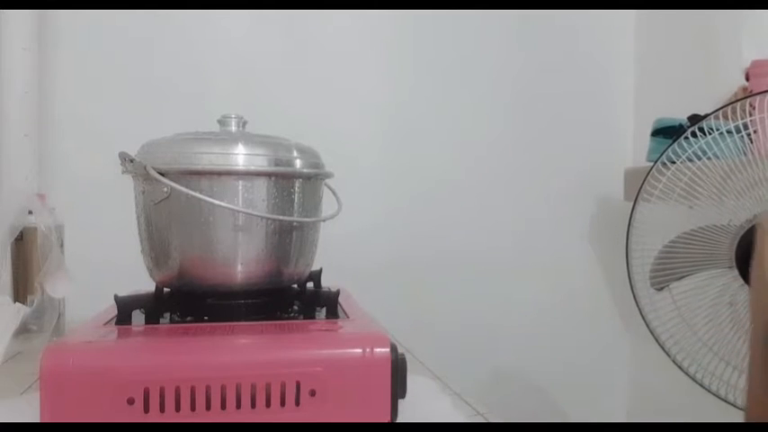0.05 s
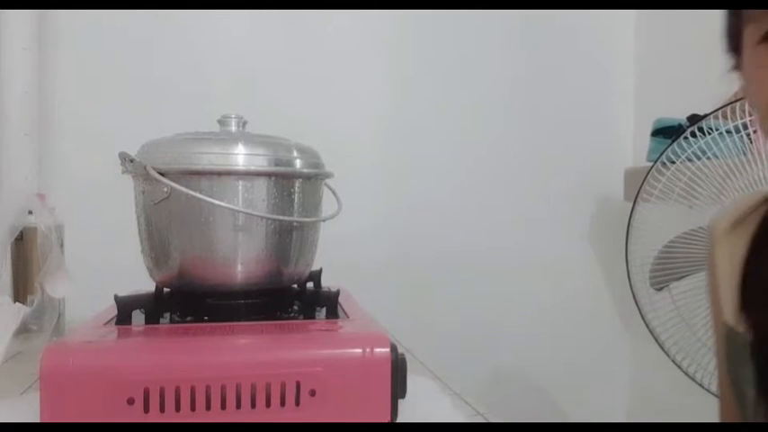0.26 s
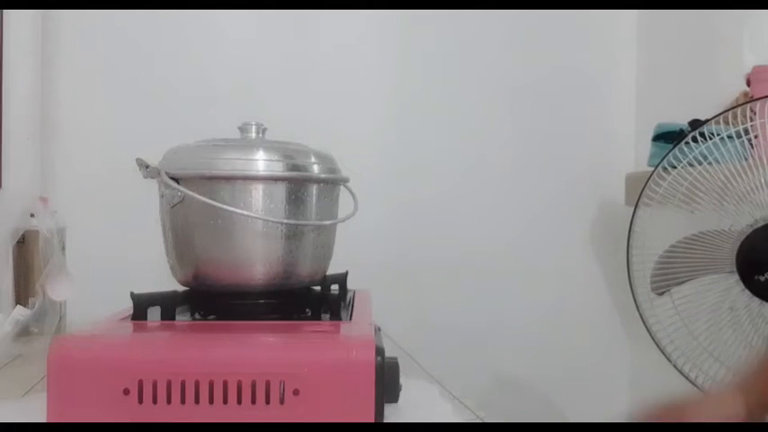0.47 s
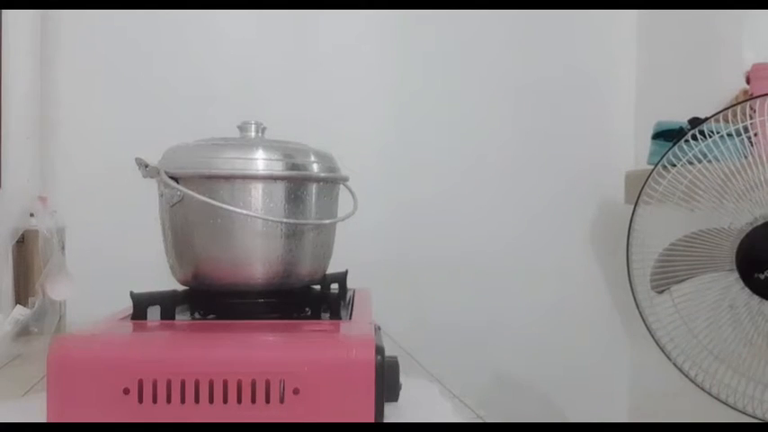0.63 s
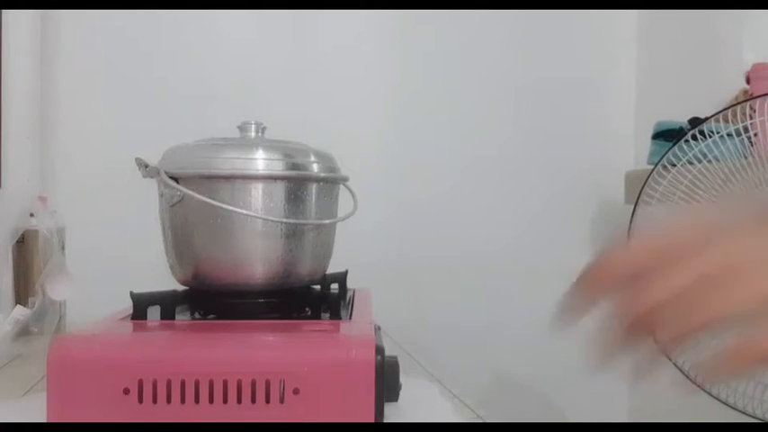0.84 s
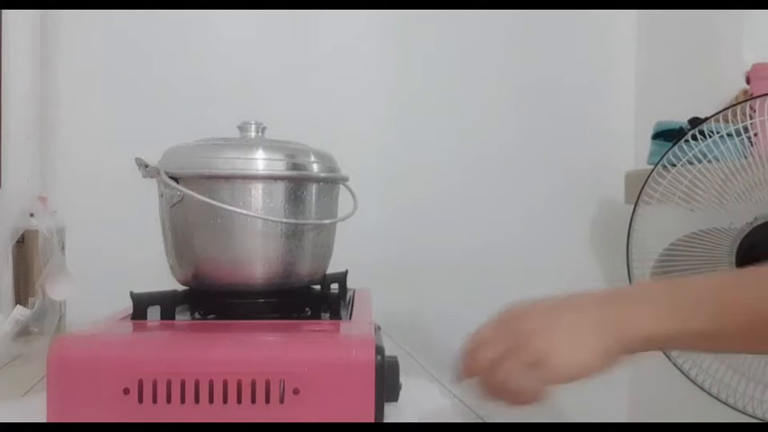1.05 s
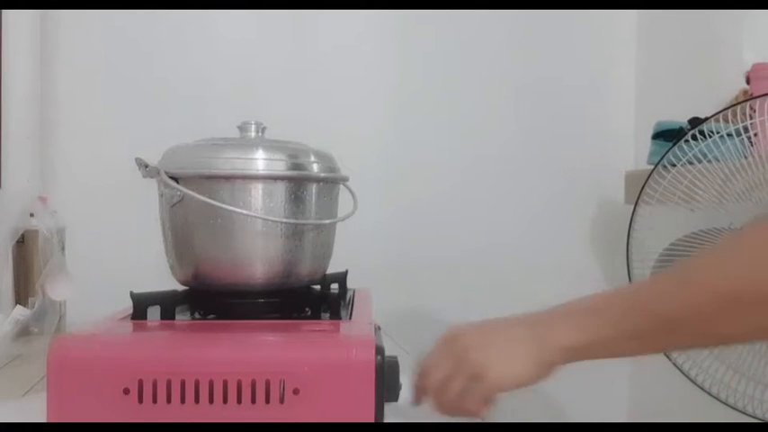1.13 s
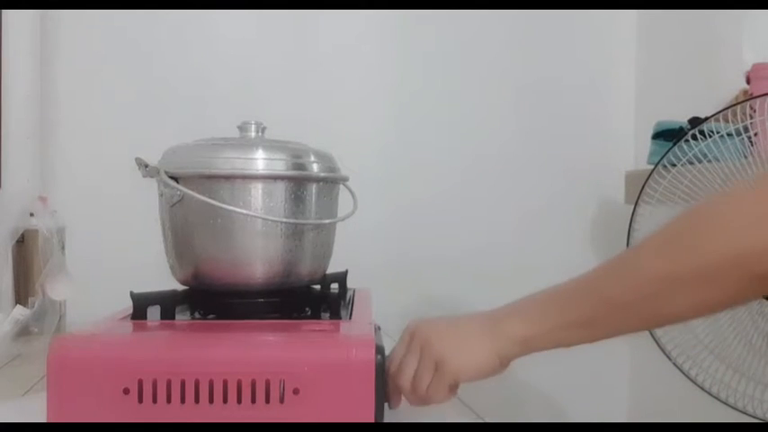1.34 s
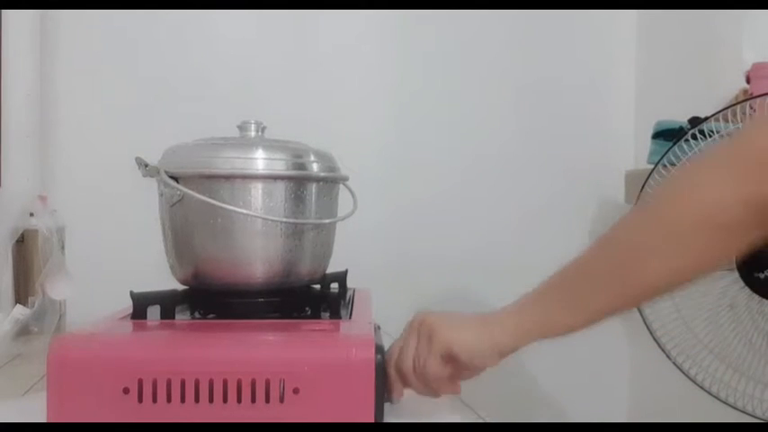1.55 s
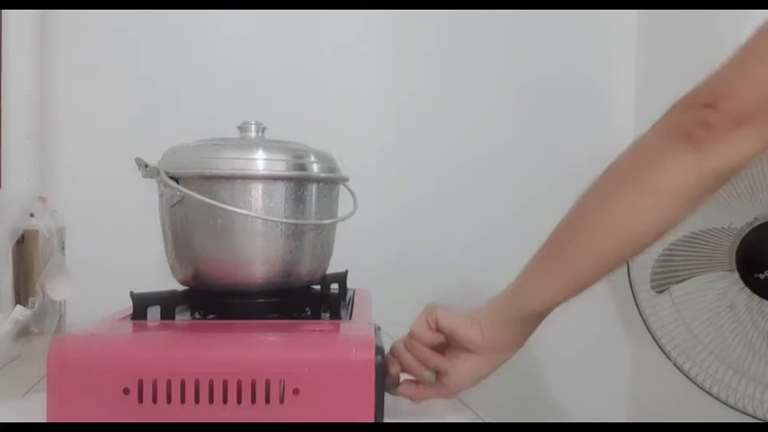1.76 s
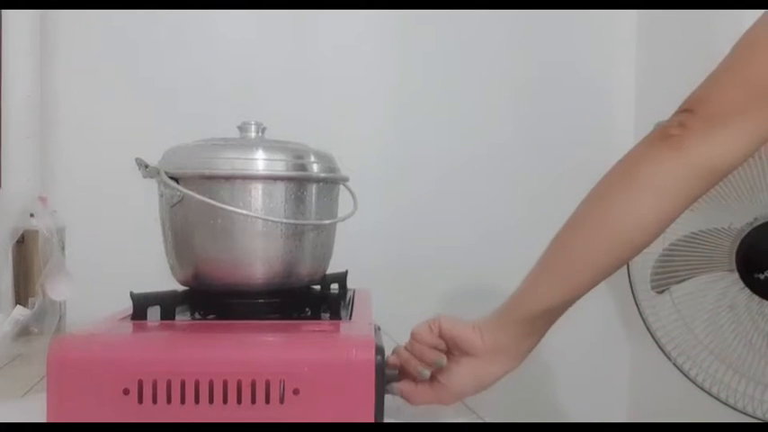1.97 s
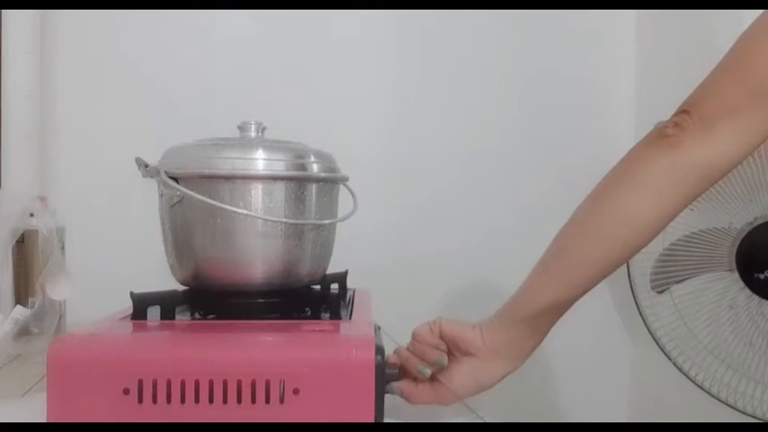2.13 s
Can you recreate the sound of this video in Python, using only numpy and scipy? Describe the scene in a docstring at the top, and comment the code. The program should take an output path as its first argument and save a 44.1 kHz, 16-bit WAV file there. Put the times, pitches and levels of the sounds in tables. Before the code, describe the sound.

Close phone microphone, small reverberant room: fading hiss, gritty scrape ending in knocks and a thud, dry handling thumps with a tiny dropout, then the stove knob's sharp metallic igniter clack and a faint singing gas jet.

```python
"""A portable gas stove in a bare, tiled room. A hiss dies away over steady air (coloured noise); a scrape (gritty noise)
ends in knocks (noise bursts plus damped modes) and a thud. The phone is bumped as it is set in place (swelling
sines, dry ticks, grip rustle) and the sound cuts out for an instant. A hand takes the knob, a squeak leads to the
igniter hammer's snap, which rings stove and pot; the gas jet hisses and whistles (noise, narrow resonance) and the
burner sings (gliding sine, narrow noise)."""
import sys
import numpy as np
from scipy import signal
from scipy.fft import rfft, irfft
from scipy.io import wavfile
from scipy.ndimage import uniform_filter1d

SR = 44100
rng = np.random.default_rng(int(sys.argv[2]) if len(sys.argv) > 2 else 0)


def dump(signal):
    """Clip the signal to [-1, 1] and save it as 16-bit WAV at the path in sys.argv[1]."""
    limited = np.clip(np.atleast_2d(signal).T, -1, 1)
    pcm = np.round(limited * 32767).astype(np.int16)
    wavfile.write(sys.argv[1], SR, pcm)


N = 97020

# Modes of stove and pot. Each row: frequency in Hz, relative level in dB, T60 in s.
STOVE_MODES = [(425.4, 6.5, 0.51), (810, 7, 0.24), (990, 10.5, 0.47), (1492, 8, 0.55), (1705, 14.5, 0.19),
               (2094, 6, 0.32), (3115, 8.5, 0.5), (3590, -3, .3), (3720, 5, .6), (8150, 19.5, 0.13)]
# Spectrum of the phone's ticks and of the squeak's noise. Each row: frequency in Hz, relative level in dB.
TICK_COLOUR = [(800, -0.5), (1300, -6), (4400, -7.5), (5200, -19), (15500, -30.5)]


def undb(db):
    """Decibels to gain."""
    return 10 ** (np.asarray(db) / 20)


def unit(x):
    """Scale to rms 1."""
    return x / np.sqrt(np.mean(x ** 2))


def one_second(x):
    """Scale to the energy of one second at rms 1."""
    return x * np.sqrt(SR / np.sum(x ** 2))


def times():
    """Time of every sample in s."""
    return np.arange(N) / SR


def fade(time_s, level_db):
    """Gain along a level curve, practically silent (-150 dB) outside it."""
    return undb(np.interp(times(), time_s, level_db, left=-150, right=-150))


def over_hz(points, hz):
    """Read (Hz, value) points on a log-frequency axis."""
    point_hz, value = np.array(points).T
    return np.interp(np.log(np.maximum(hz, 1)), np.log(point_hz), value)


def colour(x, points):
    """Minimum-phase filter of the given (Hz, dB) shape and unit energy, made by folding the cepstrum."""
    size = 4096
    gain = undb(over_hz(points, np.linspace(0, SR / 2, size // 2 + 1)))
    cepstrum = irfft(np.log(gain))
    cepstrum[1:size // 2] *= 2
    cepstrum[size // 2 + 1:] = 0
    impulse = irfft(np.exp(rfft(cepstrum)))
    return signal.fftconvolve(x, impulse / np.linalg.norm(impulse))[:N]


def noise(points):
    """Steady coloured noise, rms 1."""
    return unit(colour(rng.standard_normal(N), points))


def decay(start_s, t60_s):
    """Exponential amplitude decay from a start time."""
    age_s = times() - start_s
    return (age_s >= 0) * np.exp(-np.log(1000) * np.maximum(age_s, 0) / t60_s)


def ring(start_s, modes):
    """Damped sine modes set going at one moment, followed for at most half a second."""
    first = int(start_s * SR)
    age_s = np.arange(min(N - first, SR // 2)) / SR
    out = np.zeros(N)
    for hz, db, t60_s in modes:
        envelope = undb(db) * np.exp(-np.log(1000) * age_s / t60_s)
        out[first:first + len(age_s)] += envelope * np.sin(2 * np.pi * hz * age_s)
    return out


def contacts(hits, t60_s):
    """Power of a short burst of dense vibration for each (s, dB) contact."""
    return sum((undb(db) * decay(start_s, t60_s)) ** 2 for start_s, db in hits)


def cracks(power, points):
    """Dry, dense vibration: coloured noise that follows a power envelope."""
    return colour(np.sqrt(power) * rng.standard_normal(N), points)


def room(power, points, direct_db):
    """Direct sound plus the diffuse field that it feeds; the treble dies first."""
    # Reverberation. Each row: band centre in Hz, T60 in s.
    room_t60 = [(300, 0.62), (1400, 0.53), (4000, 0.45), (14000, .38)]
    build_s = 0.0053
    hz = np.linspace(0, SR / 2, N // 2 + 1)
    spectrum = rfft(rng.standard_normal(N))
    centres_hz = [row[0] for row in room_t60]
    build = 1 - np.exp(-times() / build_s)
    tail = 0
    for share, (_, t60_s) in zip(np.eye(len(centres_hz)), room_t60):
        response = (build * decay(0, t60_s)) ** 2
        field_power = np.abs(signal.fftconvolve(power, response / response.sum())[:N])
        band = irfft(spectrum * over_hz(list(zip(centres_hz, share)), hz), N)
        tail = tail + band * np.sqrt(field_power)
    return undb(direct_db) * cracks(power, points) + colour(tail, points)


def strike(hits, t60_s, points, modes, ring_db, direct_db):
    """Contacts heard through the room, and the strong and weak modes that the hardest one sets going."""
    shimmer_db, shimmer_t60_s, shimmer_hz = -10, 0.52, (899.7, 11463)  # many weak upper modes
    hardest_s = max(hits, key=lambda hit: hit[1])[0]
    weak = []
    for place, mode_power in rng.uniform(size=(70, 2)):
        weak.append((np.interp(place, [0, 1], shimmer_hz), 10 * np.log10(mode_power), shimmer_t60_s))
    shimmer = undb(shimmer_db) * one_second(colour(ring(hardest_s, weak), points))
    burst = one_second(room(contacts(hits, t60_s), points, direct_db))
    return burst + undb(ring_db) * one_second(ring(hardest_s, modes)) + shimmer


def whistle(hz, width_hz):
    """Turbulence in one narrow resonance that may glide: low-passed noise shifted up to hz, rms 1."""
    sos = signal.butter(2, width_hz / 2, fs=SR, output="sos")
    a, b = signal.sosfilt(sos, rng.standard_normal((2, N)))
    carrier = np.exp(2j * np.pi * np.cumsum(hz * np.ones(N)) / SR)
    return unit(np.real((a + 1j * b) * carrier))


def body(x):
    """The sheet metal colours the whole snap: a resonant lift at each mode of the stove."""
    width_hz, boost_db = 39, 2.5
    peaks = sum(signal.lfilter(*signal.iirpeak(hz, hz / width_hz, fs=SR), x) for hz, _, _ in STOVE_MODES)
    return x + (undb(boost_db) - 1) * peaks


def igniter():
    """Fingers find the knob, the cam squeaks as it loads the spring, and the hammer snaps."""
    # Fingers on the knob. Each row: start in s, relative level in dB.
    touches = [(1.2345, 0)]
    # Touch spectrum. Each row: frequency in Hz, relative level in dB.
    touch_colour = [(300, -11), (3200, -16), (5600, 7), (6800, -1), (9000, 5), (12000, -13)]
    # Hammer release, blow, rebounds. Each row: start in s, relative level in dB.
    snaps = [(1.8318, 1), (1.8358, 4.5), (1.8385, -1), (1.857, -27)]
    # Snap spectrum. Each row: frequency in Hz, relative level in dB.
    snap_colour = [(120, -25), (400, -10), (1150, -13), (1650, -7.5), (2500, -13.5), (3300, -5),
                   (6700, -12.5), (8100, -6.5), (10500, -19), (15500, -25.5)]
    touch_db, touch_t60_s, touch_direct_db = -75.5, 0.0083, -2
    squeak_s, squeak_rise_s, squeak_hz, squeak_db = 1.832, 0.022, 794, -45.5
    snap_db, snap_t60_s, snap_direct_db, snap_ring_db = -45.5, 0.022, -7.5, -10.5

    touch = one_second(room(contacts(touches, touch_t60_s), touch_colour, touch_direct_db))
    load = np.clip(1 - np.abs(times() - squeak_s) / squeak_rise_s, 0, 1)  # rises and falls linearly
    tone = unit(np.sin(2 * np.pi * squeak_hz * times()))
    squeak = load * (tone + 0.5 * noise(TICK_COLOUR))
    snap = body(strike(snaps, snap_t60_s, snap_colour, STOVE_MODES, snap_ring_db, snap_direct_db))
    return undb(touch_db) * touch + undb(squeak_db) * squeak + undb(snap_db) * snap


def gas():
    """The jet hisses and whistles higher as the valve opens; the burner tube sings soon after."""
    # Gas jet. Each row: time in s, whistle frequency in Hz, whistle level in dB, hiss level in dB.
    jet_curve = [(1.961, 4940, -71, -57), (2.026, 5040, -52, -68), (2.091, 5180, -60, -58.5),
                 (2.2, 5450, -67, -58)]
    # Jet hiss spectrum. Each row: frequency in Hz, relative level in dB.
    jet_colour = [(500, 6), (1200, 6.5), (2500, -8), (4200, 4), (6900, -1.5), (8400, 1), (9800, -12),
                  (15500, -13)]
    jet_width_hz = 150
    burner_s, burner_attack_s, burner_hz, burner_db = 2.045, 0.086, 930, -59
    sharp_hz, settle_s = 150, 0.018  # the note starts sharp and settles
    rush_hz, rush_width_hz, rush_db = 1040, 70, -64  # rush of gas around the note

    time_s, hz, whistle_db, hiss_db = np.array(jet_curve).T
    jet = whistle(np.interp(times(), time_s, hz), jet_width_hz) * fade(time_s, whistle_db)
    jet = jet + noise(jet_colour) * fade(time_s, hiss_db)
    opening = np.clip((times() - burner_s) / burner_attack_s, 0, 1)
    pitch_hz = burner_hz + sharp_hz * np.exp(-np.maximum(times() - burner_s, 0) / settle_s)
    tone = opening ** 2 * unit(np.sin(2 * np.pi * np.cumsum(pitch_hz) / SR))
    rush = np.sqrt(opening) * whistle(rush_hz, rush_width_hz)
    return jet + undb(burner_db) * tone + undb(rush_db) * rush


def clatter():
    """A low rub grows into a gritty scrape, which ends in hard knocks and a hollow thud."""
    # Rub and scrape envelopes. Each row: time in s, level in dB.
    rub_curve = [(0.155, -65), (0.185, -46), (0.225, -40.5), (0.255, -63)]
    scrape_curve = [(0.199, -32), (0.215, -34.5), (0.239, -28), (0.265, -47), (0.31, -62), (0.34, -63)]
    # Hard knocks. Each row: start in s, relative level in dB.
    knock_hits = [(0.252, 6), (0.2552, 5.5), (0.2675, 0.5), (0.2822, 3), (0.296, -3)]
    # Spectra. Each row: frequency in Hz, relative level in dB.
    rub_colour = [(100, -9), (300, 2.5), (750, -4.5), (1300, -22.5)]
    scrape_colour = [(90, -17.5), (280, 1), (900, -6), (1650, -0.5), (3300, -8), (10000, -5.5),
                     (15500, -21)]
    knock_colour = [(80, -22.5), (200, -1.5), (500, -0.5), (900, -10.5), (1600, -7), (3700, 2), (6500, -5),
                    (7600, 0), (11500, -7.5), (15500, -10.5)]
    # Modes of the knocked object and of the thud. Each row: frequency in Hz, relative level in dB, T60 in s.
    knock_modes = [(2360, -2, 0.36), (2560, 5, 0.5), (3260, -8, 0.98), (3490, 5, 0.48), (3600, -6, 0.46),
                   (3820, -6, 1), (3793, 8, 0.38), (5462, 5, .4)]
    thud_modes = [(178.7, 4.5, 0.18), (259.5, -3, 0.2), (308, 7, 0.17)]
    knock_db, knock_t60_s, knock_direct_db, knock_ring_db = -39.5, 0.024, -6.5, -12.5
    thud_s, thud_swell_s, thud_db = 0.245, 0.02, -51.5

    rub = room(fade(*np.array(rub_curve).T) ** 2, rub_colour, knock_direct_db)
    grit = unit(undb(3.04 * rng.exponential(size=N)))  # random gain, mean 3.04 dB before scaling
    scrape = room((grit * fade(*np.array(scrape_curve).T)) ** 2, scrape_colour, direct_db=-8.0)
    knocks = strike(knock_hits, knock_t60_s, knock_colour, knock_modes, knock_ring_db, knock_direct_db)
    thud = ring(thud_s, thud_modes) * np.clip((times() - thud_s) / thud_swell_s, 0, 1)
    return rub + scrape + undb(knock_db) * knocks + undb(thud_db) * one_second(thud)


def handling():
    """Soft, dry bumps reach the microphone through the phone's body; the grip rustles, the case snaps."""
    # Bumps. Each row: start in s, envelope peak in dB, pitch in Hz, swell in s, tick level in dB.
    bumps = [(0.527, -33, 278, 0.00064, -42), (0.53, -38, 105, 0.0025, -70),
             (0.5613, -36, 296, 0.0015, -47), (0.640, -44, 400, 0.0021, -56),
             (0.650, -46.5, 560, 0.0042, -61), (0.7442, -34, 260, 0.00046, -68),
             (0.7601, -35, 278, 0.0029, -52), (0.763, -29, 218, 0.0011, -42),
             (0.7862, -23.5, 292, 0.00057, -32), (0.7904, -38, 320, 0.0016, -38.5),
             (0.85, -39.5, 259, 0.0048, -53), (0.867, -47, 122, 0.0065, -70)]
    # Grip rustle. Each row: time in s, level in dB.
    grip = [(0.42, -91), (0.519, -55), (0.65, -54), (0.8, -52.5), (1.0, -67), (1.3, -78)]
    # Rustle spectrum. Each row: frequency in Hz, relative level in dB.
    grip_colour = [(35, -0.5), (150, 2.5), (550, -3), (1000, -17), (2350, -12.5), (3000, -19.5),
                   (4200, -17), (6500, -48)]
    tick_t60_s, click_s, click_db = 0.014, 0.73, -18

    out = noise(grip_colour) * fade(*np.array(grip).T)
    for start_s, peak_db, hz, swell_s, _ in bumps:
        age_s = np.maximum(times() - start_s, 0)
        envelope = age_s / swell_s * np.exp(1 - age_s / swell_s)
        out = out + undb(peak_db) * envelope * np.sin(2 * np.pi * hz * age_s)
    click = undb(click_db) * colour(signal.unit_impulse(N, int(click_s * SR)), TICK_COLOUR)
    tick_hits = [(row[0], row[4]) for row in bumps]
    return out + click + cracks(contacts(tick_hits, tick_t60_s), TICK_COLOUR)


def background():
    """Steady room air and a hiss that dies away at the start, both coloured noise."""
    # Spectra. Each row: frequency in Hz, relative level in dB.
    air_colour = [(25, -41), (55, -8), (100, 1.5), (400, -11), (3000, -24.5), (5000, -21.5), (6800, -31.5),
                  (7800, -21), (8800, -29), (15500, -28)]
    hiss_colour = [(60, -1), (300, 7), (900, -12), (2200, -6), (2900, -14), (4300, 0.5), (5800, -6.5),
                   (8000, 0), (15500, -9.5)]
    # Hiss. Each row: time in s, level in dB.
    hiss = [(0, -49), (0.05, -51.5), (0.11, -56), (0.2, -57.5), (0.3, -66)]
    air_db = -61
    return undb(air_db) * noise(air_colour) + noise(hiss_colour) * fade(*np.array(hiss).T)


def scene():
    """Everything at one microphone."""
    return (igniter() + gas() + clatter() + handling() + background())[None]


def record(dry):
    """The microphone thins the deep bass; the sound cuts out for an instant; the top is cut off."""
    low_cut_hz, top_hz = 48, 15750
    mute_from_s, mute_to_s, mute_db = 0.7115, 0.7412, -36
    thin = signal.sosfilt(signal.butter(2, low_cut_hz, "high", fs=SR, output="sos"), dry)
    live = 1.0 * ((times() < mute_from_s) | (times() > mute_to_s))
    live = uniform_filter1d(live, size=40)  # soft edges, 40 samples
    muted = thin * np.maximum(live, undb(mute_db))
    return signal.sosfilt(signal.ellip(10, 0.2, 80, top_hz, fs=SR, output="sos"), muted)


dry = scene()
out = record(dry)
dump(out)
```